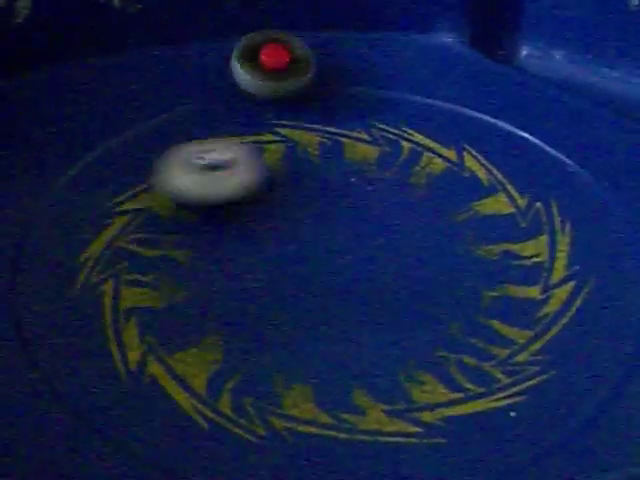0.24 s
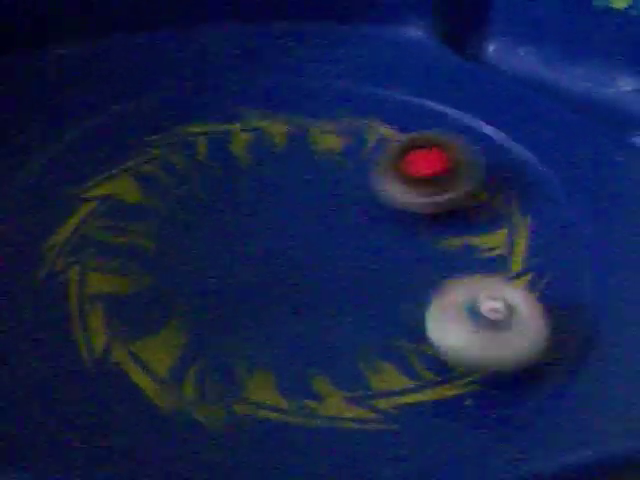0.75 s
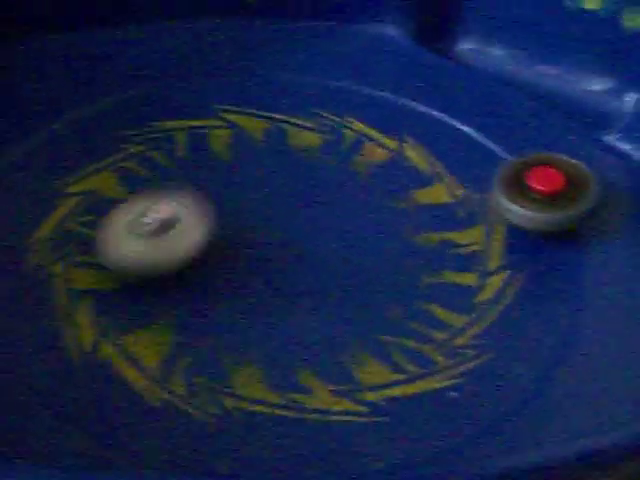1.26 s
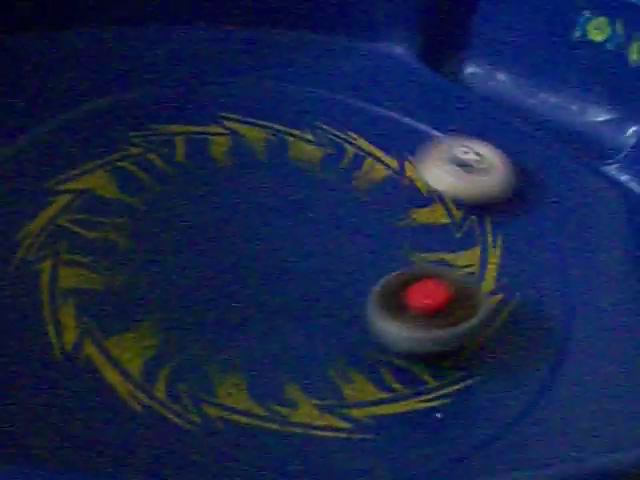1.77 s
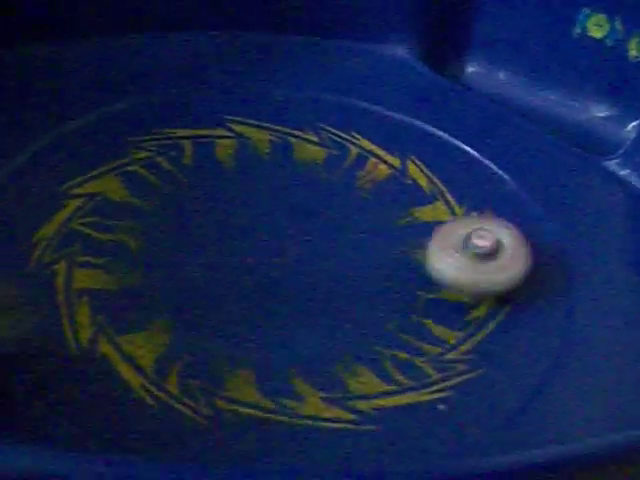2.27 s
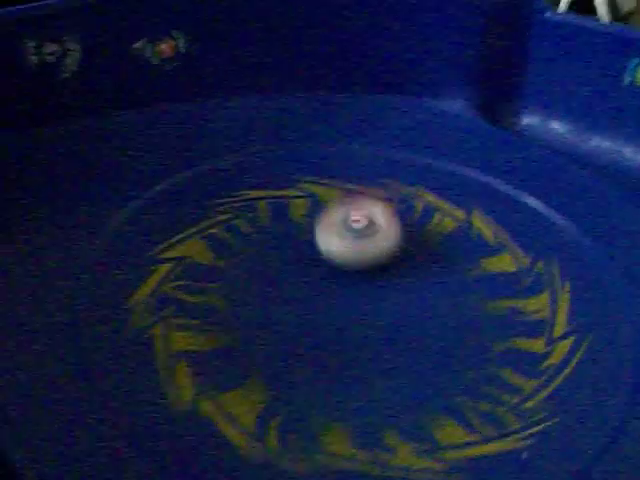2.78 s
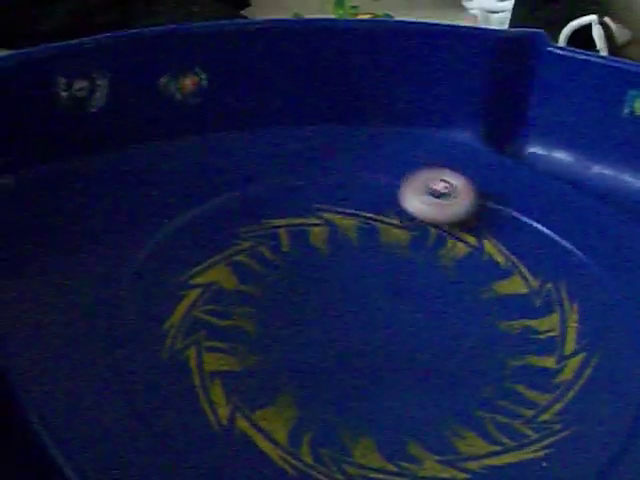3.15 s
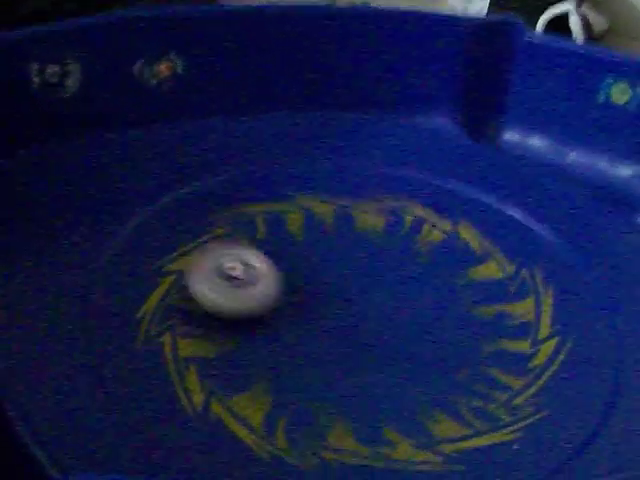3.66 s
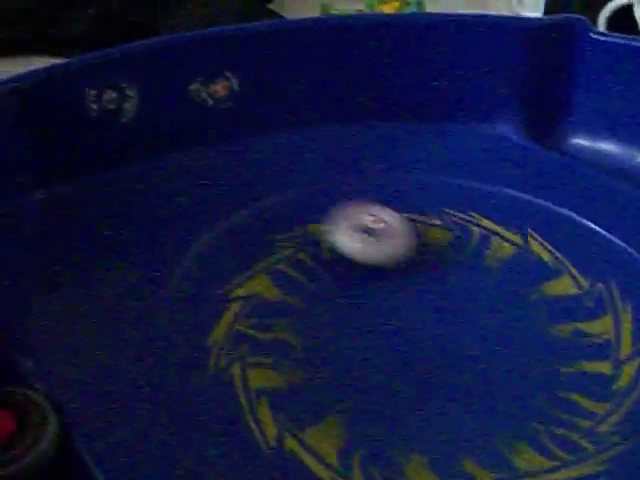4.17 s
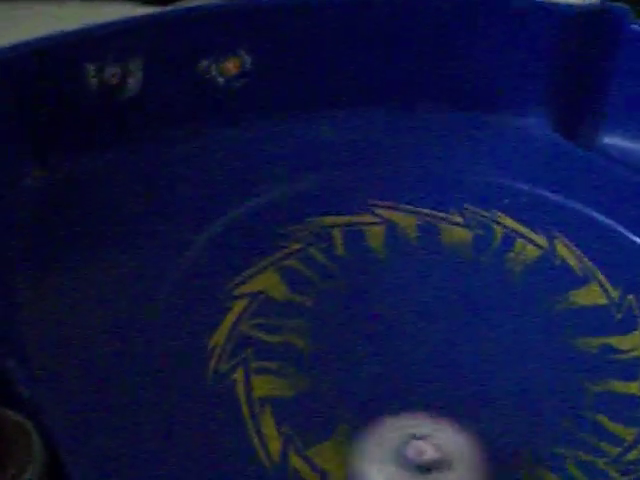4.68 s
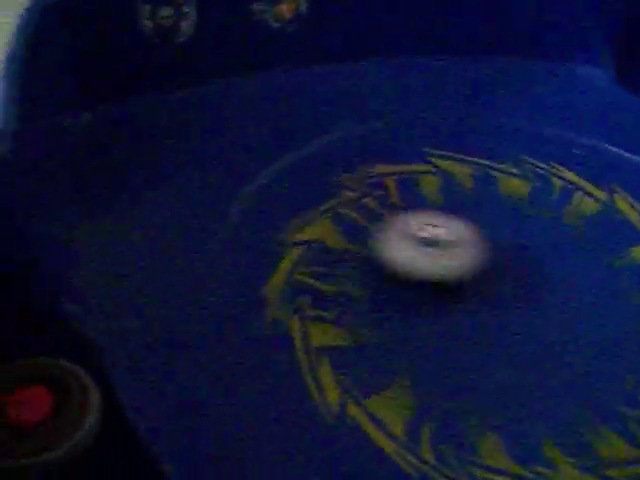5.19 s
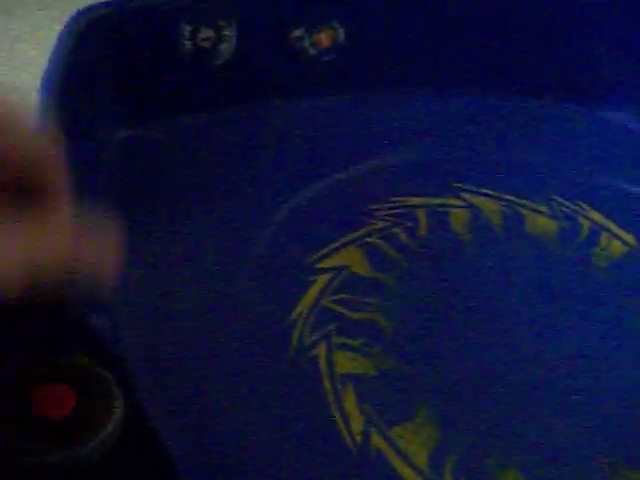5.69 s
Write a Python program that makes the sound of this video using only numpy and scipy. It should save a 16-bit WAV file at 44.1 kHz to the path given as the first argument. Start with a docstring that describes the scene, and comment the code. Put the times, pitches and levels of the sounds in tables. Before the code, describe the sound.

Two spinning tops collide in a thin plastic arena with a quick run of sharp clacks, then circle with a faint scrape and low hum. One is knocked into a side pocket and clatters loudly, with hollow knocks and short skids. More bursts of clacking follow while the other keeps whirring. After a quieter stretch, a last few clacks sound. The microphone is close, in a quiet room.

```python
"""Two spinning tops clash in a thin plastic arena; one is knocked into a side pocket and clatters there.
Blows and skids excite three mode families of the arena: ring (wall), thud (floor) and clack (treble).
The other top keeps spinning: its tip scrapes and ticks once a turn, its unbalance hums through the floor.
A small camera close by hears it through two ports, cuts the treble and clips the hardest blows."""
import sys
import numpy as np
from scipy import signal
from scipy.fft import rfft, irfft, next_fast_len
from scipy.io import wavfile
from scipy.ndimage import uniform_filter1d, map_coordinates

SR = 44100
rng = np.random.default_rng(int(sys.argv[2]) if len(sys.argv) > 2 else 0)


def transcribe(signal):
    """Save signal, clipped to [-1, 1], as a 16-bit WAV file at the path in sys.argv[1]."""
    frames = np.atleast_2d(signal).T
    limited = np.clip(frames, -1, 1)
    pcm = np.round(limited * 32767).astype(np.int16)
    wavfile.write(sys.argv[1], SR, pcm)


N = 261950
TIME_S = np.arange(N) / SR

# blows on the arena: start_s, ring_thud_db, clack_db, spot_hz (pitch the spot favours), rattle_decay_ms
IMPACTS = [(0.0097, -10, -4, 477, 7.7), (0.0516, -13.5, -7.5, 525, 2.1), (0.0868, -16.5, -11.5, 418, 4.2),
           (0.1279, -21.5, -14.5, 1300, 1), (0.1615, -18, -14.5, 482, 5.5), (0.223, -23, -10, 950, 20),
           (0.301, -16, -8, 1050, 9.7), (0.353, -17, -20, 514, 3.9), (0.3704, -21.5, -3, 615, 2),
           (0.375, -2.5, -3.5, 410, 4.1), (0.4489, -37, -16.5, 509, 7), (0.6545, -13.5, -10, 1050, 21),
           (0.7082, -39, 7, 2200, 1.2), (1.7776, -15.5, -2.5, 1020, 6), (2.2606, -8.5, 17, 1980, 2.17),
           (2.3409, -3.5, 2, 900, 5.9), (2.4021, -13.5, -3, 1300, 2.6), (2.4264, -3, 3, 1000, 5.4),
           (2.4666, 1.5, 6.5, 1240, 5.9), (2.4961, 0.5, 14, 2020, 2.34), (2.5021, -9, 13, 1236, 5.1),
           (2.512, -9.5, 10.5, 1300, 6), (2.5102, -6, 7, 1200, 1.5), (2.526, -16.5, -26, 304, 6.3),
           (2.5666, 0.5, 7.5, 876, 6.2), (2.5974, -10, -6.5, 374, 4.1), (2.6438, -10.5, 4.5, 885, 6),
           (2.7086, 1.5, 9.5, 880, 7.9), (2.7264, -12, 6, 880, 4.5), (2.8067, -37, -12.5, 475, 5.9),
           (2.8515, -3, 8.5, 1000, 14), (2.8634, -16, 5, 880, 3.6), (2.8746, -3, 6, 812, 9.3),
           (2.883, -16.5, -3, 412, 2.1), (2.894, -21.5, 5.5, 1200, 6.5), (2.9018, -16, 7.5, 1640, 6.3),
           (2.9193, -18, -8, 850, 2.9), (3.022, -9.5, 5.5, 1230, 10.8), (3.0774, -17, -1.5, 1520, 2.1),
           (3.084, -30, -10, 1000, 3.5), (3.0993, -1.5, 14, 708, 6.6), (3.2666, -34, -1.5, 2260, 4.3),
           (3.2796, -9.5, 4.5, 565, 2.7), (3.2971, -6.5, 5, 880, 10), (3.3107, -10, 7.5, 900, 10.8),
           (3.688, -22, -11, 1290, 3.4), (3.7433, 1, 9.5, 1137, 9.2), (3.7536, -6.5, 4, 1050, 6.9),
           (3.7684, -11, .6, 1600, 6.7), (3.801, -12, -1.5, 1580, 4.4), (3.8035, -23, -4, 740, 35),
           (3.9737, -21.5, -16, 1740, 4.6), (4.0118, -17.5, -9, 2190, 16), (4.0609, -2, 8, 873, 8.5),
           (4.1381, -24.5, -7, 1770, 1.2), (4.2447, -11.5, -2, 1200, 6.4), (4.2646, -2.5, 0.5, 1830, 4.4),
           (4.2725, 2.5, 13.5, 1570, 5.1), (4.292, -6, 10.5, 1600, 12), (4.3046, -5.5, -14, 730, 2.8),
           (4.321, -40, -4, 2240, 18), (4.4044, -7, 8.5, 498, 5.9), (4.454, -6.5, -1.5, 1000, 15.7),
           (4.4639, -8, 4, 1100, 7.5), (4.5807, -4, 4, 1530, 8.6), (4.591, -1, 11.5, 1720, 7.9),
           (4.6138, -4, 6.5, 1660, 2.66), (4.8873, -20, -11, 550, 1.6), (5.695, -13.5, -4, 2380, 4.2),
           (5.713, -8.5, -1.5, 1490, 4.9), (5.7232, -2, 10, 905, 7.5), (5.887, -7.5, 3, 1120, 3.2),
           (5.8944, -3, 8, 1740, 6.2), (5.914, -18.5, -4.5, 1550, 10.4), (5.9344, -22, -9, 1910, 5.5)]


def arena(tip_force):
    """Blows, skids and the tip drive the same plastic modes; each contact point weights them anew."""
    # arena modes: pitch_hz, t60_s, relative_db
    ring_modes = [(1294, 0.019, 17.5), (1447, 0.025, 14), (1800, 0.013, 14.5), (1620, .03, 9),
                  (2240, .02, 4.5), (2550, 0.022, 2)]
    thud_modes = [(306.4, 0.053, -4), (433, 0.065, -0.5), (512.7, .06, 2), (640, 0.011, 6), (741.6, 0.1, 4),
                  (850.3, 0.043, -0.5), (1053, 0.055, -17.5)]
    clack_modes = [(3055, 0.024, -29), (3413, 0.0065, -5), (4103, 0.011, 3.5), (4100, 0.078, 3.5),
                   (4290, 0.0089, 17), (4710, 0.055, -8.5), (5035, 0.009, 13.5)]
    # broadband crack of ring, thud, clack: low_hz, high_hz, gain_db
    cracks = [(1195, 4260, 11), (363, 1100, -26.5), (3383, 7940, 7)]
    pulses = blow_pulses()
    blow_gains = undb(blow_levels_db())
    spot_hz = np.array(IMPACTS)[:, [3]]
    rubs = tip_force + skids()
    rubs[0] *= undb(-2)  # rubbing drives ring less than thud
    out = np.zeros(N)
    for family, modes in enumerate((ring_modes, thud_modes, clack_modes)):
        hz, t60_s, mode_db = np.transpose(modes)
        near_spot = np.exp(-(np.log(hz / spot_hz) / 0.081) ** 2)
        scatter_db = 2 * rng.standard_normal(near_spot.shape)
        blow_share = unit_energy(undb(mode_db + 16.4 * near_spot + scatter_db))
        rub_share = unit_energy(undb(mode_db))
        for k in range(len(modes)):
            force = rub_share[k] * contact_drift(spread_db=3.0) * rubs[family]
            add_pulses(force, pulses, blow_gains[family] * blow_share[:, k])
            out += (-1) ** k * resonate(force, hz[k], t60_s[k])  # neighbours in antiphase
        low_hz, high_hz, crack_db = cracks[family]
        force = undb(-2.5) * rubs[family]  # rubbing excites the crack less than blows do
        add_pulses(force, pulses, blow_gains[family])
        out += (-1) ** family * undb(crack_db) * bandpass(force, low_hz, high_hz)
    return signal.sosfilt(signal.butter(3, 250.0, "highpass", fs=SR, output="sos"), out)


def blow_pulses():
    """First contact, rattle of loose parts, faint afterbuzz: (start sample, unit-energy force) each."""
    rattle, pulses = grit(spread_db=0.45), []
    for start_s, *_, decay_ms in IMPACTS:
        start = int(start_s * SR)
        ms = 1000 * np.arange(min(SR // 6, N - start)) / SR
        rise = 1 - np.exp(-ms / (0.18 * decay_ms))
        afterbuzz = undb(-26) * np.exp(-ms / (5.1 * decay_ms))
        pulse = rise * (np.exp(-ms / decay_ms) + afterbuzz) * rattle[start:start + len(ms)]
        pulse[0] = 2.2  # first contact
        pulses.append((start, unit_energy(pulse)))
    return pulses


def blow_levels_db():
    """Force per blow on ring, thud, clack: high-pitched spots ring the wall, low ones thud the floor."""
    _, low_db, clack_db, spot_hz, _ = np.transpose(IMPACTS)
    crossover_hz, blend_octaves = 1057, 0.27
    wall = (1 + np.tanh(np.log2(spot_hz / crossover_hz) / blend_octaves)) / 2
    return low_db - 8.5 * (1 - wall), low_db - 17 * wall, clack_db


def skids():
    """The fallen top skids in its pocket: friction force on ring, thud, clack."""
    # skids: start_s, hold_s, clack_db, ring_thud_db
    slides = [(2.298, 0.026, -34, -52), (2.434, 0.058, -51, -40.5), (2.526, 0.23, -33.5, -53.5),
              (3.086, 0.023, -30, -50), (3.364, 0.16, -43.5, -70), (4.058, 0.021, -39, -58.5),
              (4.409, 0.08, -32, -45), (4.569, 0.35, -39, -50)]
    attack_s, release_db_per_s = 0.055, 178
    friction = grit(spread_db=5.0) * undb(1.65 * walk(rate_hz=47.0))
    gains = np.zeros((3, N))
    for start_s, hold_s, clack_db, low_db in slides:
        attack = np.clip((TIME_S - start_s) / attack_s + 1, 0, 1)  # full at start_s
        release = undb(-release_db_per_s * np.maximum(TIME_S - start_s - hold_s, 0))
        gains += attack * release * undb([[low_db], [low_db], [clack_db]])
    return gains * friction


def spinning_tip(turns):
    """The leaning top ticks once a turn, then bears down and scrapes: force on ring, thud, clack."""
    # scrape along the top's path: time_s, clack_db, ring_thud_db
    scrape_levels = [(0.0, -47.5, -52.5), (0.3, -51, -52.5), (0.52, -40.5, -51.5), (0.85, -48, -55.5),
                     (1.14, -49.5, -58), (1.5, -48, -54.5), (1.93, -45.5, -58), (2.15, -49, -57),
                     (2.26, -45.5, -54.5), (4.97, -55, -62.5), (5.19, -47.5, -58), (5.54, -46, -54),
                     (5.82, -44.5, -56), (5.94, -48, -63)]
    load = undb(rng.uniform(-1, 5.7, int(turns[-1]) + 2))[turns.astype(int)]
    throb = 0.36 + load * np.exp(-(turns % 1) / 0.36)
    tick = 0.85 * load * np.diff(np.floor(turns), prepend=0)
    clack_gain, low_gain = undb(curves(scrape_levels))
    return np.array([gain * unit_rms(throb * grit(spread_db=2.5) + tick)
                     for gain in (low_gain, low_gain, clack_gain)])


def unbalance_hum(turns):
    """The unbalance shakes the floor at harmonics of the spin rate, swelling as the top leans."""
    # steady hum, harmonic: level_db
    steady_db = {1: -62, 2: -56.5, 3: -57.5, 5: -60.5, 7: -67.5}
    # hum swells per harmonic: centre_s, width_s, level_db
    swells = {1: [(.05, 0.25, -47), (.96, 0.39, -47.5), (1.92, 0.21, -45.5)], 2: [(.12, 0.26, -48.5),
              (.45, 0.19, -51), (1.15, 0.46, -43.5), (1.65, 0.26, -51), (3.15, 0.49, -50.5),
              (3.59, 0.36, -50), (4.48, 0.21, -51.5), (5.33, 0.34, -56)], 3: [(.5, 0.86, -47),
              (1.2, 0.66, -50.5), (1.57, 0.27, -45.5), (1.95, 0.27, -47), (2.17, 0.21, -50),
              (2.41, 0.18, -46), (3.29, 0.068, -49.5), (3.87, 0.2, -48.5), (4.48, 0.081, -40)],
              5: [(.6, 0.99, -51.5), (1.3, 0.45, -56.5), (2.2, 0.5, -55.5), (4.85, 0.24, -49.5)],
              7: [(1.01, 0.22, -58), (1.63, 0.36, -45.5), (2.4, .3, -44), (4.6, 0.6, -48.5)]}
    hum = np.zeros(N)
    for harmonic, base_db in steady_db.items():
        level = undb(base_db) + sum(undb(db) * np.exp(-(2 * (TIME_S - centre_s) / width_s) ** 2)
                                    for centre_s, width_s, db in swells[harmonic])
        flutter = undb(0.24 * walk(rate_hz=7.1))
        hum += level * flutter * np.sin(2 * np.pi * (harmonic * turns + rng.random()))
    return hum


def floor_rumble():
    """Rolling rumbles the floor; each thud shakes it into a further burst."""
    # rolling rumble: time_s, level_db
    rolling = [(0.0, -38.5), (.2, -47.5), (1.0, -48.5), (1.57, -54.5), (2.2, -48.5), (2.4, -33.5),
               (2.62, -43), (2.8, -51.5), (3.3, -50.5), (3.95, -66), (4.3, -56.5), (4.78, -42.5),
               (5.0, -51.5), (5.94, -51)]
    shake_db, shake_t60_s = -40, 0.19
    _, thud_db, _ = blow_levels_db()
    kicks = np.zeros(N)
    kicks[(np.array(IMPACTS)[:, 0] * SR).astype(int)] = undb(thud_db + shake_db)
    shake = signal.lfilter([1], [1, -decay(1 / SR, shake_t60_s)], kicks)
    return (undb(curves(rolling)[0]) + shake) * bandpass(rng.standard_normal(N), 60.0, 279.0)


def floor_bumps():
    """The tumbling top bumps the floor: deep damped sines."""
    # bumps: start_s, pitch_hz, level_db
    bumps = [(2.255, 45, -38.5), (2.566, 112.7, -27), (2.571, 62, -30.5), (2.576, 215, -33.5),
             (2.9, 47.4, -36), (4.6, 40.6, -49.5)]
    out = np.zeros(N)
    for start_s, hz, db in bumps:
        age_s = np.maximum(TIME_S - start_s, 0)
        out += undb(db) * decay(age_s, t60_s=0.35) * np.sin(2 * np.pi * hz * age_s)
    return out


def wall_echo(x):
    """Direct sound plus a wall reflection whose lag swings once a lap."""
    echo_db, mean_ms, swing_ms, lap_s, farthest_s = -15, 0.9, 0.31, 1.3, 0.709
    lag_ms = mean_ms + swing_ms * np.cos(2 * np.pi * (TIME_S - farthest_s) / lap_s)
    return x + undb(echo_db) * map_coordinates(x, [(TIME_S - lag_ms / 1000) * SR], mode="constant")


def shell_tail(x):
    """The hollow shell and the room smear each contact into a short tail."""
    t = TIME_S[:SR // 2]
    response = rng.standard_normal(len(t)) * decay(t, t60_s=0.15) * (t > 0.004)
    return signal.fftconvolve(x, undb(-15) * unit_energy(response))[:N]


def room_noise():
    """Still air and camera hiss."""
    # noise spectrum: frequency_hz, relative_density_db
    spectrum = [(15, -59), (25, -39), (65, -7), (342, -1.5), (437, -26.5), (764, 4), (977, -47.5),
                (1170, -0.5), (5220, -49.5), (6790, -63.5), (11500, -120)]
    hz, db = np.transpose(spectrum)
    bins_hz = np.maximum(np.arange(N // 2 + 1) * SR / N, 1)
    shape = undb(np.interp(np.log(bins_hz), np.log(hz), db))
    return undb(-63.5) * unit_rms(irfft(rfft(rng.standard_normal(N)) * shape, N))


def grit(spread_db):
    """Dense contacts of uneven size; rms 1."""
    return unit_rms(rng.standard_normal(N) * undb(spread_db * np.minimum(rng.exponential(size=N), 6.0)))


def contact_drift(spread_db):
    """Gain that drifts as the contact point moves."""
    steps = uniform_filter1d(rng.standard_normal(N // 1024 + 1), size=5)
    return undb(spread_db * unit_rms(np.repeat(steps, 1024)[:N]))


def walk(rate_hz):
    """Smooth random wander; rms 1."""
    width = int(SR / rate_hz)
    return unit_rms(uniform_filter1d(uniform_filter1d(rng.standard_normal(N), width), width))


def resonate(force, hz, t60_s):
    """One mode as a two-pole band-pass."""
    r, w = decay(1 / SR, t60_s), 2 * np.pi * hz / SR
    gain = np.sqrt((1 - r * r) / (2 * np.sin(w)))
    return signal.lfilter([gain, 0, -gain], [1, -2 * r * np.cos(w), r * r], force)


def bandpass(x, low_hz, high_hz):
    """Impulse response energy near 1."""
    sos = signal.butter(2, [low_hz, high_hz], "bandpass", fs=SR, output="sos")
    return signal.sosfilt(sos, x) * np.sqrt(SR / 2 / (high_hz - low_hz))


def add_pulses(force, pulses, gains):
    for (start, pulse), gain in zip(pulses, gains):
        force[start:start + len(pulse)] += gain * pulse


def curves(table):
    """Columns of a time table, one value a sample."""
    times_s, *columns = np.transpose(table)
    return np.array([np.interp(TIME_S, times_s, column) for column in columns])


def decay(age_s, t60_s):
    return np.exp(-np.log(1000) * age_s / t60_s)


def undb(db):
    return 10 ** (np.asarray(db) / 20)


def unit_rms(x):
    return x / np.sqrt(np.mean(x ** 2))


def unit_energy(x):
    return x / np.sqrt(np.sum(x ** 2, axis=-1, keepdims=True))


def scene():
    """Arena, floor and room at two ports; the left hears everything slightly later."""
    # slowing spin: time_s, turns_so_far
    rotation = [(0, 0), (.743, 34), (1.231, 56), (1.463, 66), (2.262, 100), (3.422, 145), (3.661, 154),
                (5.111, 207), (5.665, 227), (5.95, 237)]
    turns = curves(rotation)[0]
    tip_force = spinning_tip(turns)
    floor = unbalance_hum(turns) + floor_rumble() + floor_bumps()
    shell = wall_echo(arena(tip_force))
    right = shell + shell_tail(shell) + floor + room_noise()
    port_lag_s, size = 83e-6, next_fast_len(N + 64)
    bins_hz = np.arange(size // 2 + 1) * SR / size
    left = irfft(rfft(right, size) * np.exp(-2j * np.pi * bins_hz * port_lag_s), size)[:N]
    return np.array([left, right])


def record(dry):
    """The camera rolls the treble off, then cuts it; the hardest blows clip at full scale."""
    rolloff_hz, stopband_hz = 5100.0, 7128.0
    soft = signal.sosfilt(signal.butter(4, rolloff_hz, fs=SR, output="sos"), dry)
    cut = signal.sosfilt(signal.cheby2(6, 50, stopband_hz, fs=SR, output="sos"), soft)
    return np.clip(cut, -1, 1)


dry = scene()
out = record(dry)
transcribe(out)
```